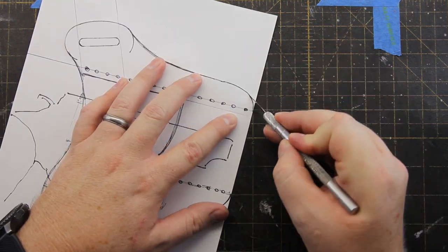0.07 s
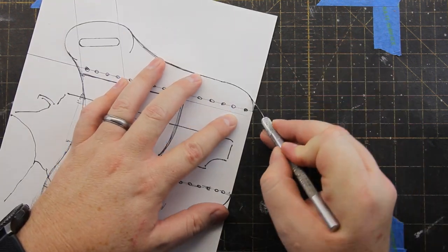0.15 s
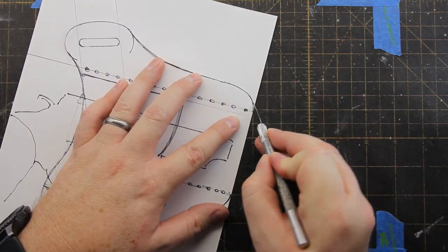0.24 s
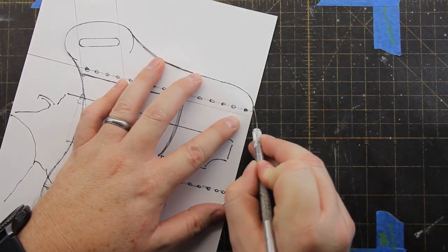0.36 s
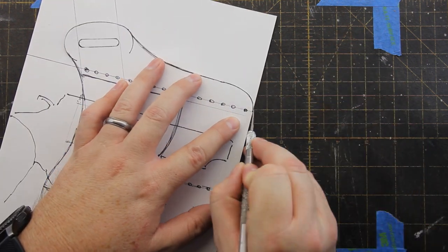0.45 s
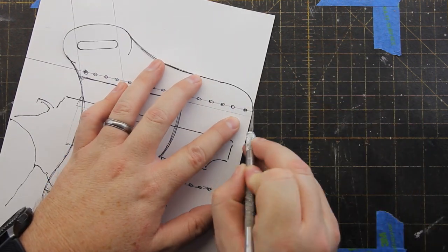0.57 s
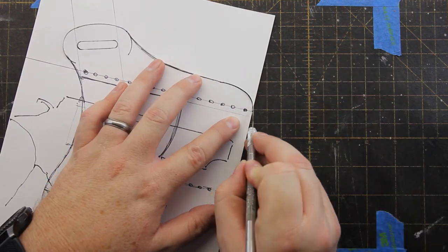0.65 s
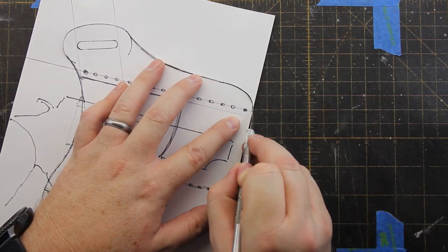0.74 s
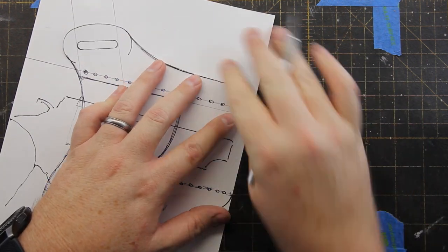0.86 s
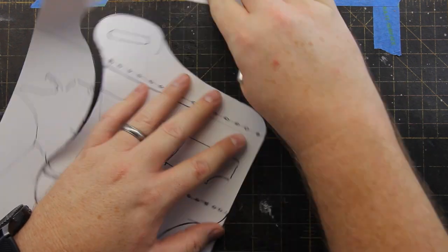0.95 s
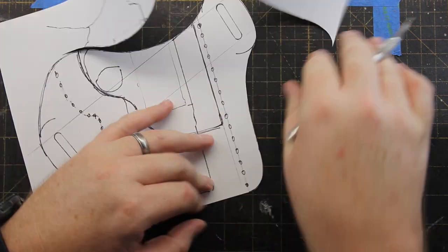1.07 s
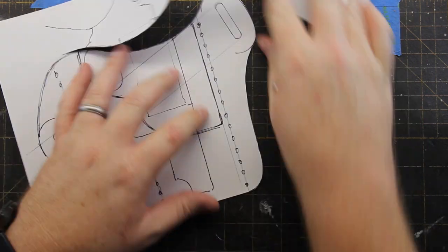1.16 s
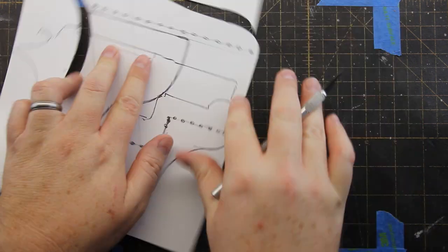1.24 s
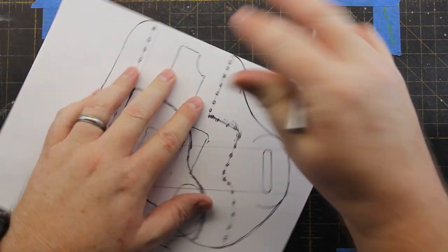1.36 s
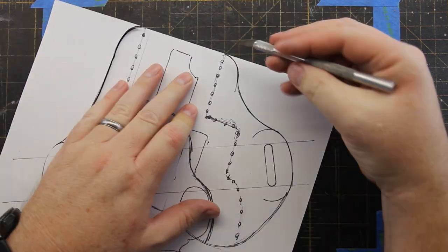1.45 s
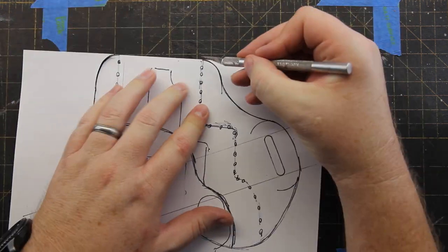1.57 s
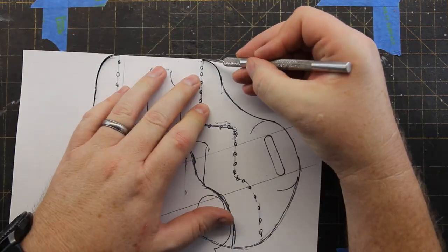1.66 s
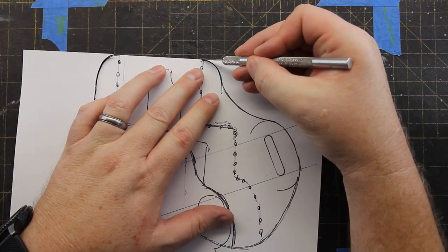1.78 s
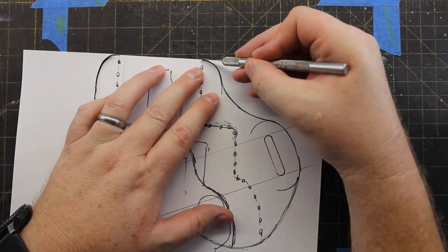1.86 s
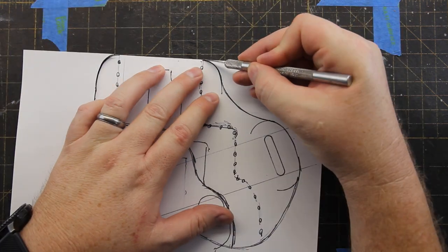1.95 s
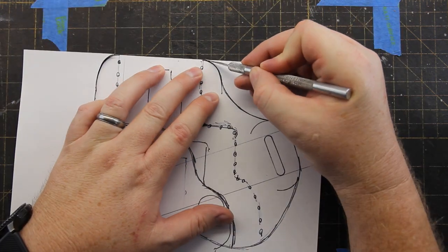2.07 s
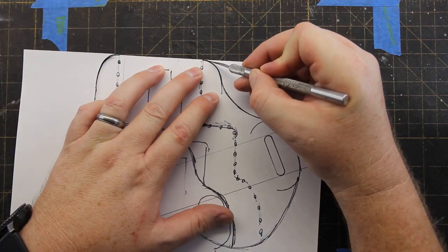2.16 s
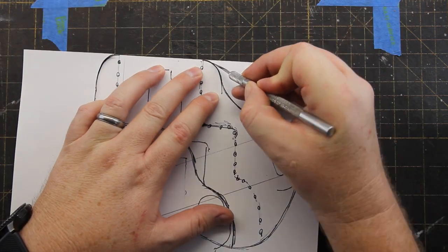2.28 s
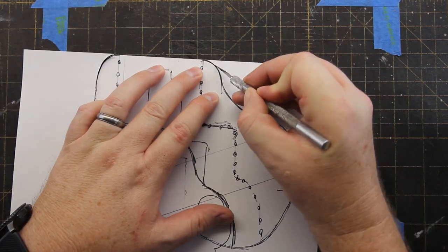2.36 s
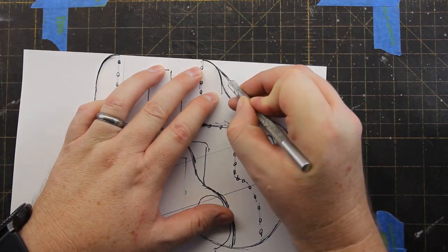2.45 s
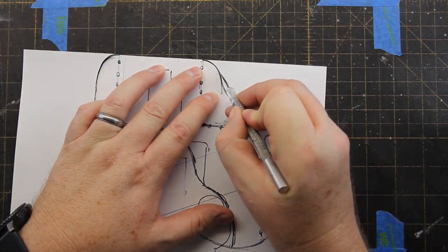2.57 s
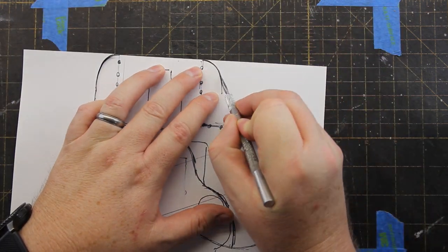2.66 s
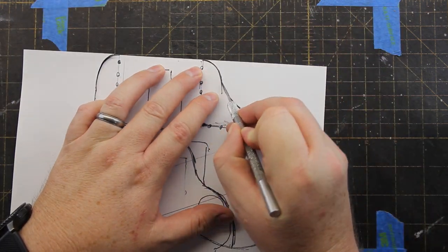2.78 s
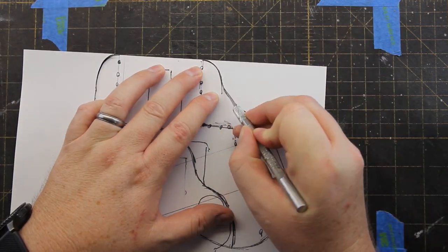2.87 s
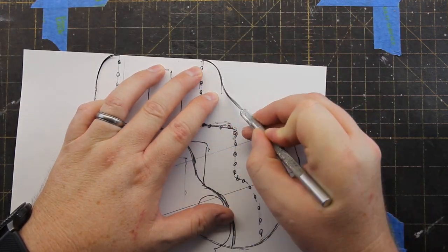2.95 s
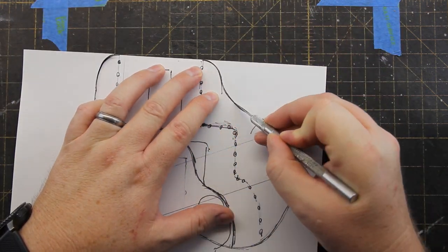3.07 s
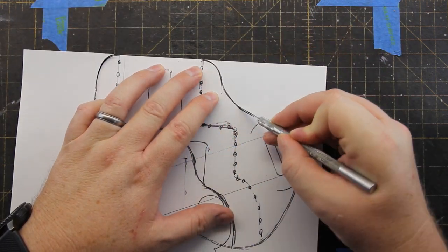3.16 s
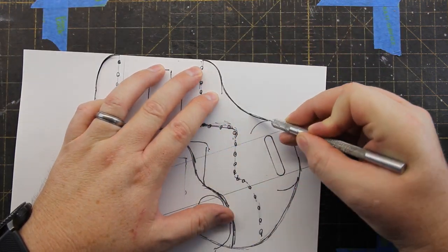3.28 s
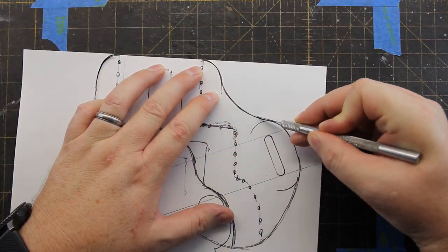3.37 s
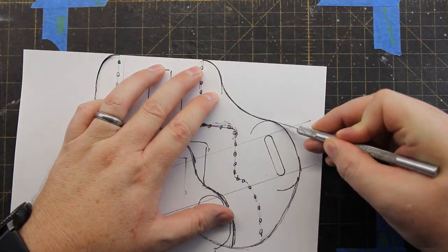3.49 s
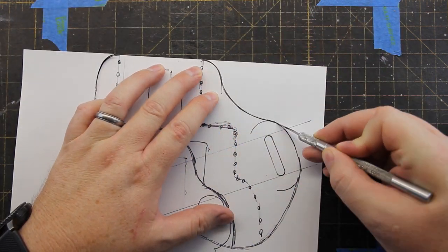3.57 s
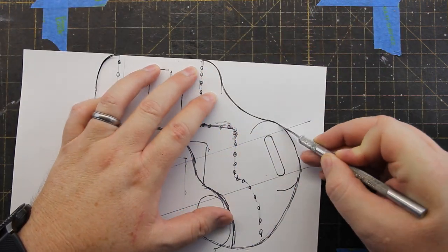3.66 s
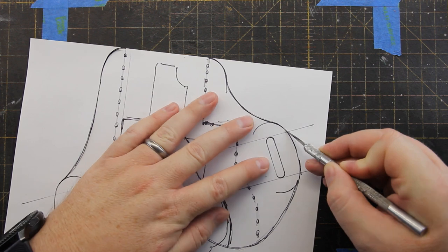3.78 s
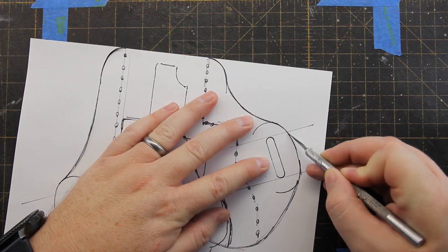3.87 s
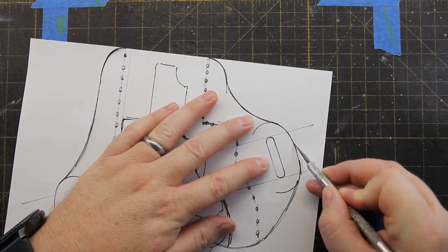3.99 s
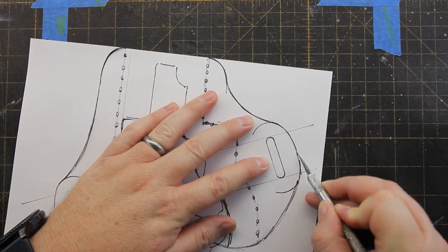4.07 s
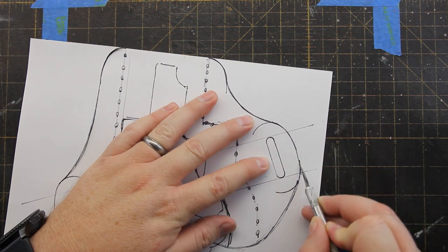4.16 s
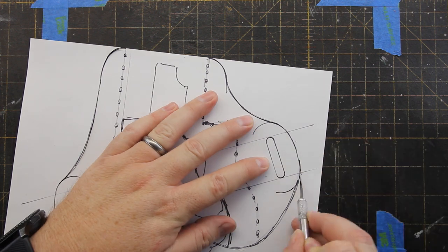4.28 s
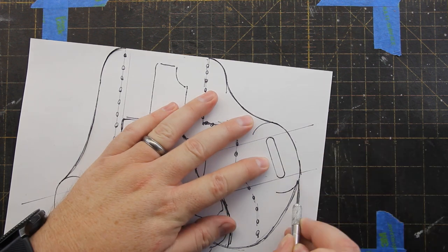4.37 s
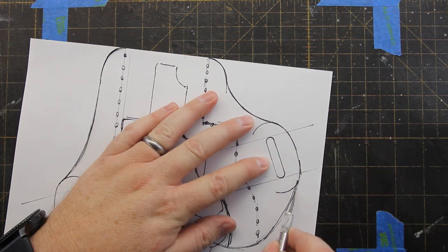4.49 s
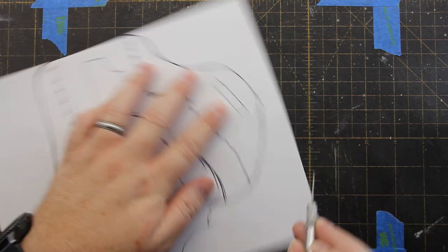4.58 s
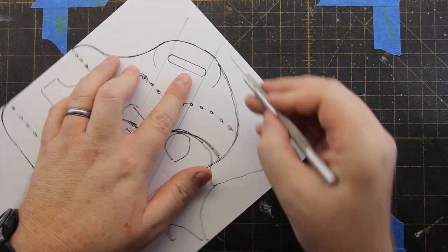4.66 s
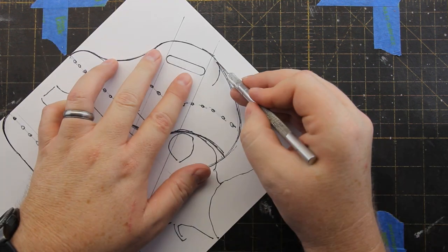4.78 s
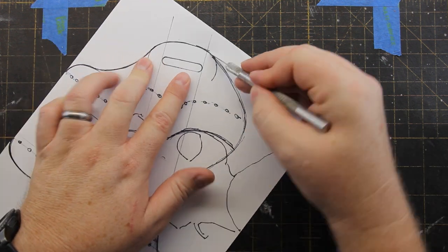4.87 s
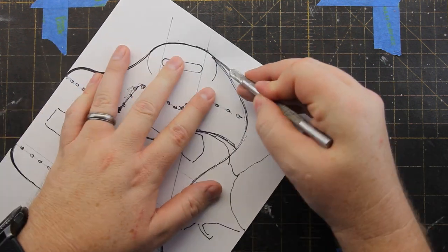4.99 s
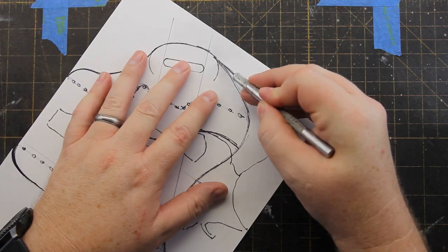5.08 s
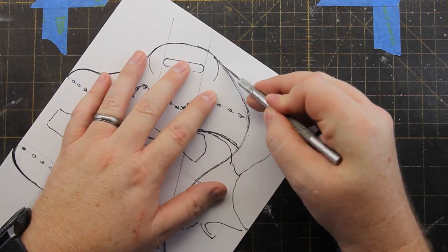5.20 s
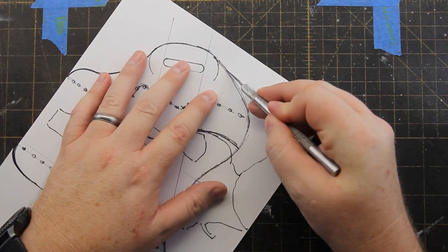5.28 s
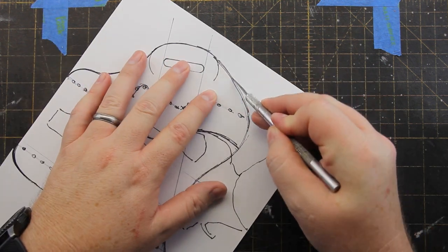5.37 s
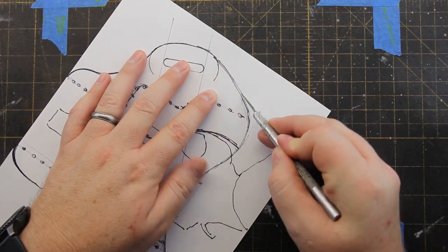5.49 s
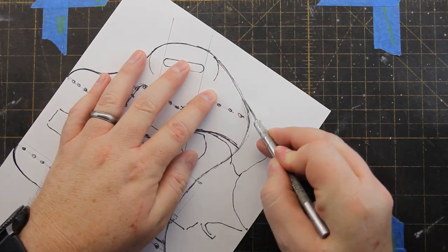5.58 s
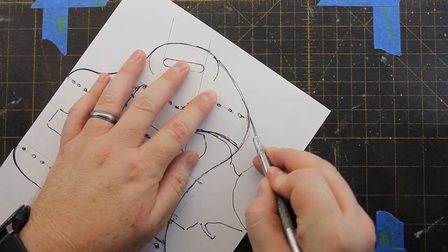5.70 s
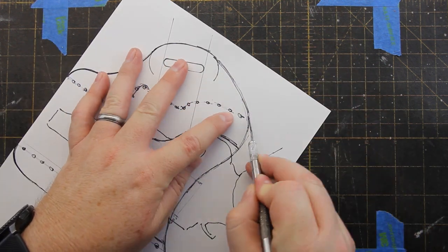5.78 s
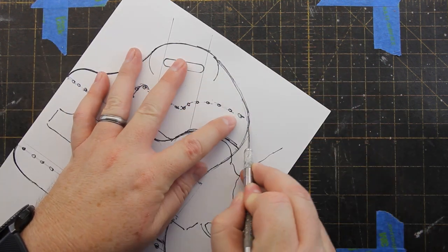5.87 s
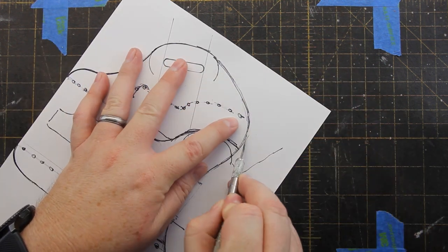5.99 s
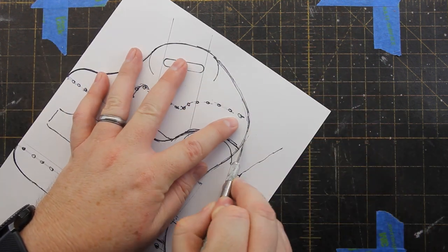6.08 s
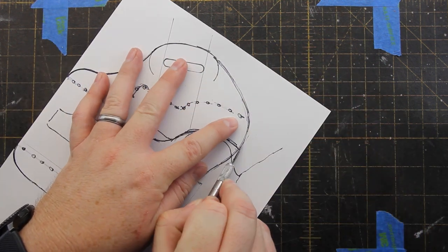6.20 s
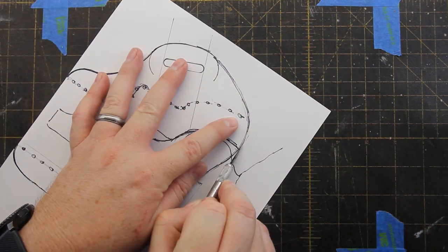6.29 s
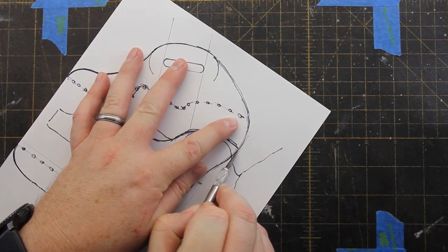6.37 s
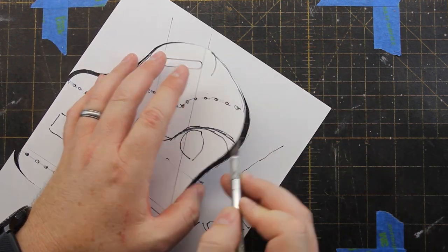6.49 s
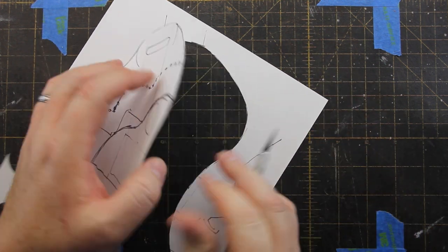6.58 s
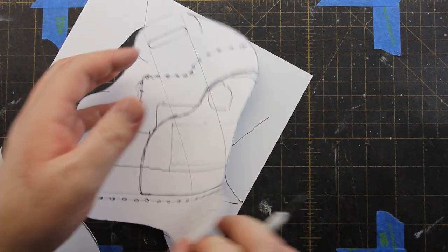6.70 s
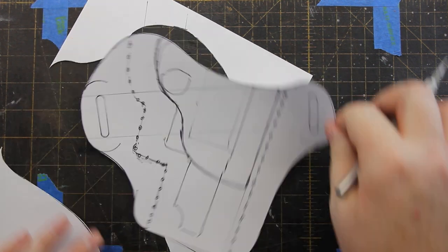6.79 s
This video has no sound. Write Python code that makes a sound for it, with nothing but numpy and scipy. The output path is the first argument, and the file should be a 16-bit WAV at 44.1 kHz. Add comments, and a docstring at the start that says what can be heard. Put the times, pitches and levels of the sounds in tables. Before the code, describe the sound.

Steady airy machine rush with a wavering motor whine, nearly silent knife cutting, a bright paper slide early and one sharp paper snap near the end.

```python
"""In a workshop, at a cutting mat close to one microphone, a hobby knife draws almost silently through paper.
Behind it a machine runs: air rushing through a housing, steady tones and a beating motor whine.
Hands and knife bump the mat as damped rings. The sheet is slid round with a bright hiss of slipping fibres;
the cut piece bends as it is lifted, and snaps as its stiff sheet buckles and rings."""
import sys
import numpy as np
from scipy import signal
from scipy.fft import rfft, irfft, next_fast_len
from scipy.io import wavfile
from scipy.ndimage import uniform_filter1d

SR = 44100
rng = np.random.default_rng(int(sys.argv[2]) if len(sys.argv) > 2 else 0)


def wav_out(sig):
    """Save sig, one row per channel (or a flat mono array), as 16-bit PCM at SR to the path in sys.argv[1]."""
    wavfile.write(sys.argv[1], SR, np.round(np.clip(np.atleast_2d(sig).T, -1, 1) * 32767).astype(np.int16))


N = 301688  # samples, about 6.84 s
T = np.arange(N) / SR


def undb(db):
    """Decibels to gain."""
    return 10 ** (np.asarray(db) / 20)


def unit(x):
    """Scale to rms 1."""
    return x / np.sqrt(np.mean(x ** 2))


def curves(table):
    """Each column of a table after the time, joined by straight lines."""
    seconds, *columns = np.transpose(table)
    return [np.interp(T, seconds, column) for column in columns]


def colour(x, points):
    """Give x a spectrum of (Hz, dB) points, joined along log frequency."""
    hz, db = np.transpose(points)
    size = next_fast_len(len(x))
    f = np.maximum(np.fft.rfftfreq(size, 1 / SR), 1)
    gain = undb(np.interp(np.log(f), np.log(hz), db))
    return irfft(rfft(x, size) * gain, size)[:len(x)]


def band(x, hz, width):
    """A resonance with gain 1 at its centre."""
    return signal.lfilter(*signal.iirpeak(hz, hz / width, fs=SR), x)


def walk(rate):
    """Smooth chance with a spread near 1, drawing rate new values a second."""
    hold = max(int(SR / rate), 1)
    steps = np.repeat(rng.standard_normal(N // hold + 1), hold)
    return unit(uniform_filter1d(steps, hold)[:N])


def oscillator_phase(hz):
    """Phase in radians of a pitch that changes from sample to sample."""
    return 2 * np.pi * np.cumsum(hz) / SR


def fibres(length, rate, spread_db):
    """Friction: tiny slips of uneven size, about rate of them a second."""
    slips = rng.random(length) < rate / SR
    size = rng.standard_normal(length) * undb(spread_db * rng.standard_normal(length))
    return unit(slips * size + 1e-9)


def add(out, s, x):
    """Mix x into out from time s."""
    i = int(s * SR)
    out[i:i + len(x)] += x[:max(len(out) - i, 0)]


# Colour of the rushing air behind the bench. Each row: frequency in Hz, gain in dB.
AIR = [(30, -50), (60, -33), (120, -28), (200, -18.5), (290, -5), (400, -6.5), (560, -3.5), (900, -3),
       (1700, 1), (3000, 0.5), (5000, 0), (8000, -3.5), (11000, -6.5), (15500, -10.5)]
# Resonances of the machine's housing. Each row: frequency in Hz, width in Hz, gain on the air in dB.
HOUSING = [(500, 44, -14), (1560, 190, -31.5), (2840, 190, -8), (4670, 270, -10), (5270, 130, -10),
           (7920, 200, -5), (12120, 340, -4.5)]


def rushing_air(level_db=-53):
    """A steady rush of coloured noise, with the housing's resonances ringing in parallel."""
    air = colour(rng.standard_normal(N), AIR)
    rings = sum(undb(db) * band(air, hz, width) for hz, width, db in HOUSING)
    return unit(air + rings) * undb(level_db + 0.35 * walk(8.9))


# Steady tones of the machine. Each row: frequency in Hz, rms level in dB.
TONES = [(565, -77), (1626, -74), (1733, -75.5), (9003, -72), (9561, -94), (10130, -69), (10695, -71.5)]
# Low hum of the machine, swelling and fading. Each row: time in seconds, rms level in dB.
HUM_LEVEL = [(0, -87.5), (2.8, -74), (4.5, -83), (5.4, -77), (6.84, -85)]


def machine_tones(hum_hz=303, hum_rise_hz_per_s=4, drift_hz=3.32):
    """Thin tones and a slowly climbing hum, all wavering a little in pitch and level."""
    hum_db, = curves(HUM_LEVEL)
    tones = np.zeros(N)
    for hz, db in [*TONES, (hum_hz + hum_rise_hz_per_s * T, hum_db)]:
        phase = oscillator_phase(hz + drift_hz * walk(40))
        tones += undb(db + 2.2 * walk(9)) * np.sin(phase)
    return np.sqrt(2) * tones  # a sine of this peak has rms 1


# The motor slows, recovers a little and sags again. Each row: time in seconds, pitch of the whine in Hz.
WHINE_PITCH = [(0, 1401), (.8, 1352), (1.9, 1305), (2.6, 1289), (3.9, 1306), (5.7, 1286), (6.84, 1280)]
# Whine, main and side tone together. Each row: time in seconds, level in dB.
WHINE_LEVEL = [(0.0, -62), (0.55, -68), (0.78, -55.5), (0.88, -69), (0.99, -58.5), (1.24, -70.5),
               (1.96, -57), (2.23, -73), (2.48, -61), (3.03, -77), (3.14, -62.5), (3.75, -63), (4.36, -57),
               (5.56, -62.5), (5.85, -58), (5.94, -69.5), (6.59, -57), (6.84, -74)]
# Strength shifts to and from the upper side tone. Each row: time in seconds, side against main tone in dB.
SIDE_TONE = [(0, -5), (.8, -16), (1.5, -4), (2.1, -2), (2.5, -9), (3.1, 9), (4.3, -2), (4.8, -17),
             (5.7, -2.5), (6.84, 0)]
# Load on the motor, which brings the overtones out. Each row: time in seconds, level in dB.
LOAD = [(0, -83), (3, -85), (3.8, -66.5), (4.6, -65.5), (5.2, -68.5), (5.65, -62.5), (6.1, -66.5),
        (6.5, -66), (6.84, -74)]
# Overtones of the motor. Each row: multiple of the whine's pitch, level against the load curve in dB.
OVERTONES = [(1.82, 0), (2.01, 1), (2.66, -3.5), (3.0, 0.5), (3.67, 2), (3.76, -5.5), (3.99, -5.5),
             (4.05, -6), (5.01, -4.5)]


def motor(side_hz=34, side_waver_hz=4, waver_hz=2.898, grain_rate=115, rough=0.87, line_share=0.51):
    """A whine that sags in pitch and beats unevenly with a side tone; load adds rough overtones."""
    hz, = curves(WHINE_PITCH)
    side_db, = curves(SIDE_TONE)
    load_db, = curves(LOAD)
    whine_db, = curves(WHINE_LEVEL)
    # the two tones share the whine's power
    main_db = whine_db - 10 * np.log10(1 + undb(side_db) ** 2)
    phase = oscillator_phase(hz + waver_hz * walk(30))
    beat = oscillator_phase(side_hz + side_waver_hz * walk(25))
    grainy_tone = np.sin(phase) + 0.34 * walk(grain_rate) * np.cos(phase)
    sound = undb(main_db + 0.8 * walk(13)) * grainy_tone
    sound += undb(main_db + side_db + 2.0 * walk(14)) * np.sin(phase + beat)
    for multiple, over_db in OVERTONES:
        # each overtone is a weak line inside a narrow band of turbulence
        turbulence = (walk(grain_rate) + 1j * walk(grain_rate)) / np.sqrt(2)
        grain = line_share + rough * turbulence
        overtone = np.imag(grain * np.exp(1j * multiple * phase))
        sound += undb(load_db + over_db + 1.6 * walk(6.5)) * overtone
    return np.sqrt(2) * sound


# Hands and knife bump the mat close by. Each row: start in seconds, level of the lower ring in dB,
# its pitch in Hz, level of the contact tick in dB before its trim.
BUMPS = [(.217, -54, 536, -59), (.606, -54, 900, -51), (.919, -49, 980, -53), (0.96, -65, 170, -39),
         (1.325, -45.5, 287, -37), (1.42, -47, 391, -44), (3.683, -51, 680, -54), (3.733, -48, 650, -48),
         (3.819, -41, 570, -50), (4.604, -48, 870, -40), (4.968, -49.5, 531, -55), (5.18, -57, 804, -40),
         (5.885, -52, 830, -43), (6.439, -48.5, 990, -40)]


def double_band(noise, hz, width):
    """Noise through the same resonance twice, at rms 1."""
    return unit(band(band(noise, hz, width), hz, width))


def bumps(ring_t60=0.061, width_hz=280, table_hz=108, table_db=-15,
          tick_trim_db=-2, tick_hz=5000, tick_t60=0.049, soft_s=0.0014):
    """Soft contacts: two damped rings of the mat over a low table thud, under a short dry tick."""
    out, t = np.zeros(N), np.arange(SR // 5) / SR
    for s, db, hz, contact_db in BUMPS:
        # the upper ring, an octave above, is weaker for higher-pitched contacts
        octave_db = -2.5 - 0.0026 * hz
        push, scuff = rng.standard_normal((2, len(t)))
        low = double_band(push, hz, width_hz)
        high = double_band(push, 2 * hz, 0.71 * width_hz)
        table = double_band(push, table_hz, 0.26 * table_hz)
        # only the firmest contacts reach fully through to the table
        weight = np.interp(db, [-44, -40], [.1, 1])
        rings = low + undb(octave_db) * high + weight * undb(table_db) * table
        thud = rings * undb(db - 60 * t / ring_t60)
        tick = unit(band(scuff, tick_hz, 8000)) * undb(contact_db + tick_trim_db - 60 * t / tick_t60)
        add(out, s, (thud + tick) * (1 - np.exp(-t / soft_s)))
    return out


def rustle(strokes, spectrum, edge_db, leak_db, crackle_db, catch_db):
    """Paper fibres slip; the free flap radiates above its lowest ring, and catches and crackles as it goes."""
    out = np.zeros(N)
    for s, length, db, hz in strokes:
        # a push gathers speed, holds it, then dies away; longer pushes coast longer
        coast_s = 0.0051 + 0.23 * length
        t = np.arange(int((length + 6 * coast_s) * SR)) / SR
        gather = np.minimum(t / (0.44 * length), 1)
        speed = gather * np.exp(-np.maximum(t - length, 0) / coast_s)
        # a dense rub with sparse, larger snags
        dense = fibres(len(t), rate=22000, spread_db=0.0)
        snags = fibres(len(t), rate=550, spread_db=0.6)
        rub = unit(colour(dense + undb(crackle_db) * snags, spectrum))
        flap_filter = signal.cheby1(4, 1, hz, "high", fs=SR, output="sos")
        above = unit(signal.sosfilt(flap_filter, rub))
        edge = unit(band(above, hz * 1.16, hz * 0.18))
        paper = unit(above + undb(edge_db) * edge + undb(leak_db) * rub)
        add(out, s, undb(db) * speed * paper)
    return out * undb(catch_db * walk(300))


# The cut piece bends as it is lifted. Each row: start in seconds, length in seconds, level in dB,
# lowest ring of the free flap in Hz.
FLEXES = [(6.483, 0.0042, -41, 4030), (6.499, .016, -46, 10000), (6.52, 0.037, -56, 6000),
          (6.6, .1, -53, 4750), (6.638, 0.012, -41, 7000), (6.671, 0.016, -40, 4270),
          (6.733, 0.017, -31.5, 4520), (6.755, 0.027, -43.5, 7400), (6.812, .04, -39.5, 7000)]
# Colour of bending paper, also used for the crack of a snap. Each row: frequency in Hz, gain in dB.
FLEX_COLOUR = [(600, -30), (2000, -10), (3600, -6), (5200, 0), (8000, 1), (11000, 0), (15500, 0),
               (17000, -25)]


def bending():
    """Fibres slip inside the flexing piece, with a stronger flap edge than in sliding."""
    return rustle(FLEXES, FLEX_COLOUR, edge_db=-8.0, leak_db=-10, crackle_db=-6, catch_db=0.5)


# The sheet buckles near the microphone. Each row: start in seconds, level in dB.
SNAPS = [(6.7403, -21), (6.7449, -28), (6.7455, -3), (6.7461, -18), (6.758, -20)]
# Ringing of the stiff sheet. Each row: frequency in Hz, level within the snap in dB, 60 dB decay in seconds.
SHEET = [(7500, 3.5, 0.01), (7730, -9, 0.0069), (5120, -15.5, 0.013), (6450, -16, 0.0025),
         (9430, 1.5, 0.0037)]


def snaps(crack_db=-15, crack_t60=0.0068, build_s=0.00064, puff_db=-57):
    """Each buckle cracks, rings the stiff sheet for a moment and pushes a little air."""
    out, t = np.zeros(N), np.arange(SR // 20) / SR
    ring = sum(undb(db - 60 * t / t60) * np.sin(2 * np.pi * hz * t) for hz, db, t60 in SHEET)
    puff = undb(puff_db - 60 * t / 0.027) * np.sin(2 * np.pi * 85 * t)
    for s, db in SNAPS:
        noise = unit(colour(rng.standard_normal(len(t)), FLEX_COLOUR))
        crack = undb(crack_db - 60 * t / crack_t60) * noise
        add(out, s, undb(db) * (ring + crack + puff) * (1 - np.exp(-t / build_s)))
    return out


# Paper sliding on the mat. Each row: start in seconds, length of the push in seconds, level in dB,
# lowest ring of the free flap in Hz.
SLIDES = [(.603, 0.0044, -42.5, 10200), (.864, .004, -46, 11000), (.903, 0.011, -41, 9500),
          (.956, 0.038, -31.5, 9200), (.98, .038, -27, 4050), (1.038, 0.059, -25, 6160),
          (1.14, .075, -37, 9400), (1.213, .021, -27, 10200), (1.228, .05, -36.5, 7750),
          (1.284, 0.04, -33.5, 12200), (1.33, .055, -50, 12400), (4.627, .027, -39, 10200)]
# Colour of rubbed paper. Each row: frequency in Hz, gain in dB.
SLIDE_COLOUR = [(600, -49), (2000, -20), (3600, -9), (5500, -5), (7000, -2), (9800, 2), (15500, 5),
                (17000, -20)]


def sliding():
    """Fibres rub over the mat with a bright hiss in short pushes."""
    return rustle(SLIDES, SLIDE_COLOUR, edge_db=-12, leak_db=-9.5, crackle_db=-7.5, catch_db=1.3)


# Blade in the cut, close to the microphone. Each row: time in seconds, level in dB.
BLADE_LEVEL = [(0, -56.5), (.8, -64), (2.3, -60.5), (2.7, -81), (3.2, -72), (3.8, -60.5), (4.5, -58),
               (5.8, -62), (6.2, -76), (6.84, -67)]


def blade():
    """The edge parts fibres with a faint, uneven scratch."""
    db, = curves(BLADE_LEVEL)
    scratch = band(fibres(N, rate=3500, spread_db=2.5), 4400, 3700)
    return unit(scratch) * undb(db + 2.5 * walk(22))


def room(x, tail_db=-25, tail_t60=0.21):
    """The table and nearby walls return a faint, short tail."""
    t = np.arange(SR // 4) / SR
    tail = rng.standard_normal(len(t)) * undb(-60 * t / tail_t60)
    return x + undb(tail_db) * signal.fftconvolve(x, tail / np.linalg.norm(tail))[:N]


def scene():
    """Everything reaches one microphone, the same in both channels; only the rustling gets the room's tail."""
    machine = rushing_air() + machine_tones() + motor()
    paper = room(bending() + sliding()) + snaps()
    mono = machine + bumps() + paper + blade()
    return np.array([mono, mono])


def record(dry):
    """The recorder cuts the top steeply above 15.8 kHz."""
    low_pass = signal.ellip(12, .1, 85, 15800, fs=SR, output="sos")
    return signal.sosfilt(low_pass, dry)


dry = scene()
out = record(dry)
wav_out(out)
```